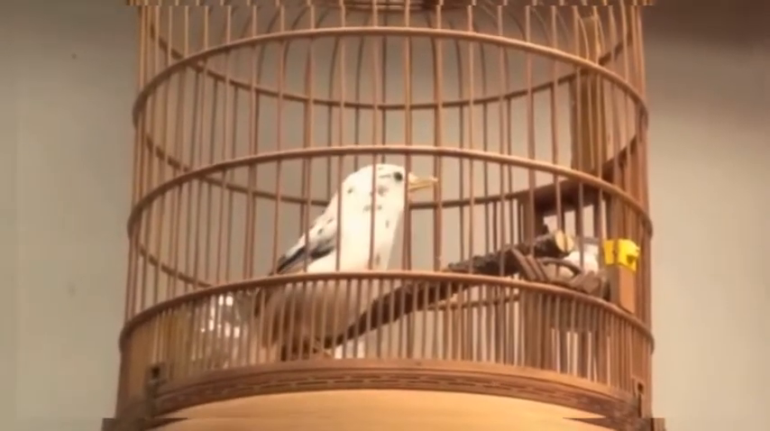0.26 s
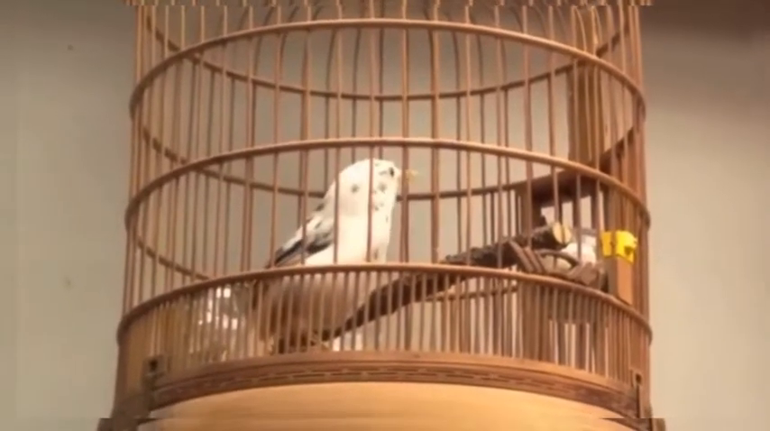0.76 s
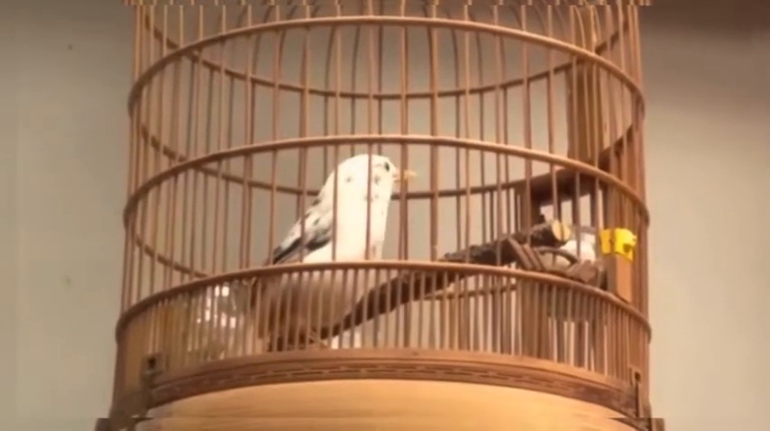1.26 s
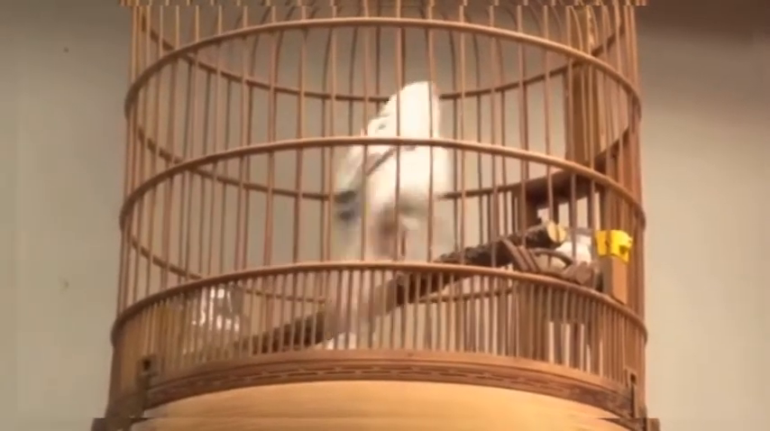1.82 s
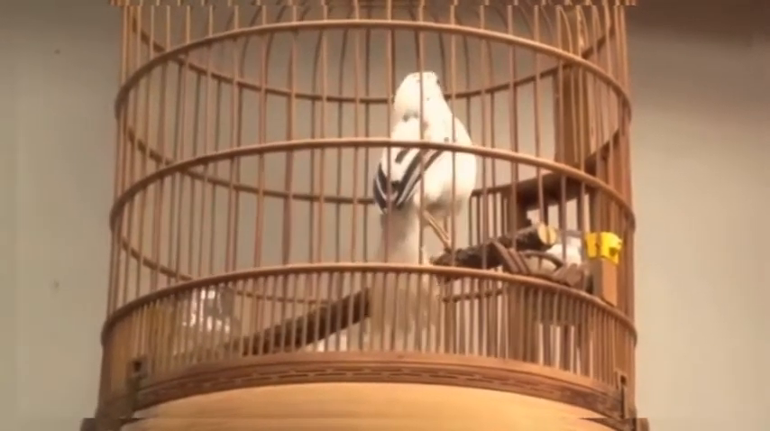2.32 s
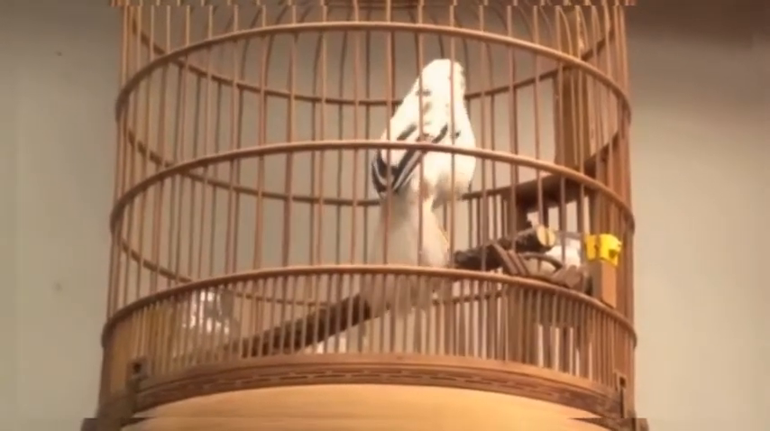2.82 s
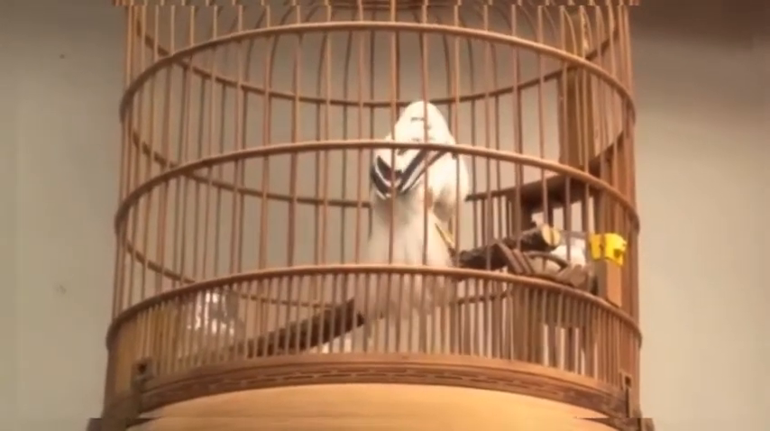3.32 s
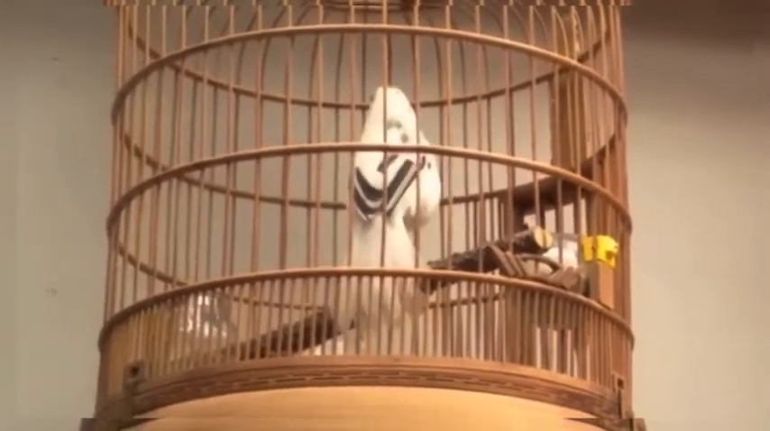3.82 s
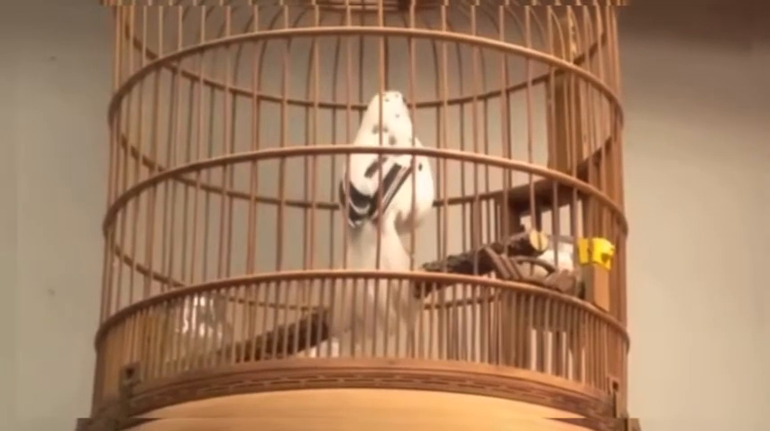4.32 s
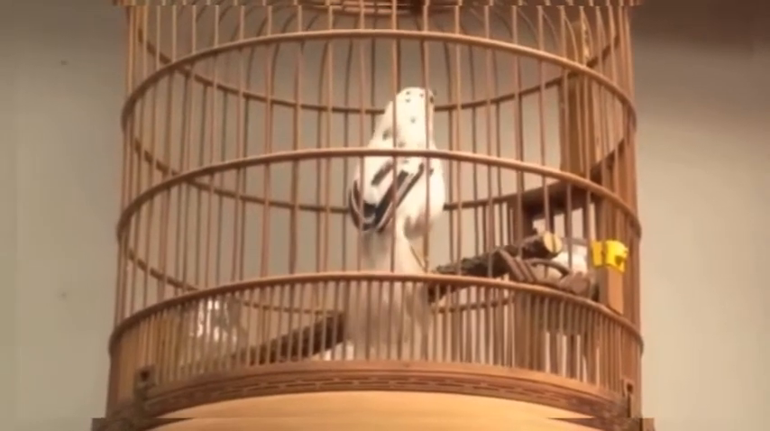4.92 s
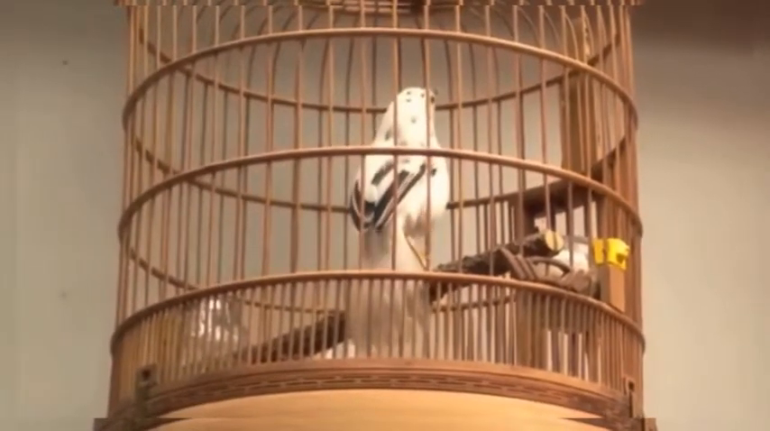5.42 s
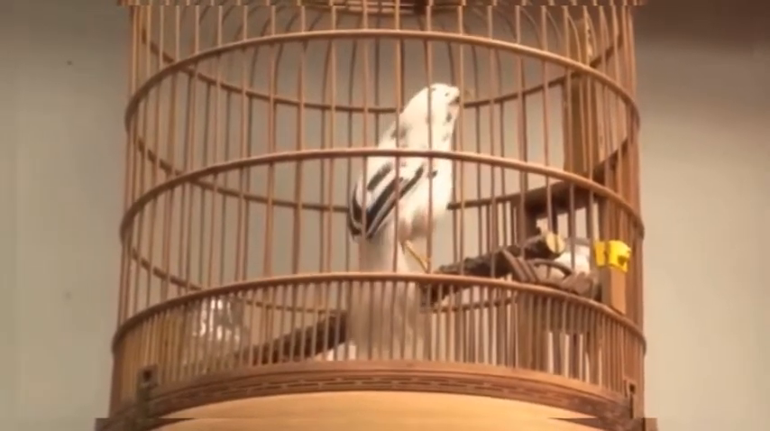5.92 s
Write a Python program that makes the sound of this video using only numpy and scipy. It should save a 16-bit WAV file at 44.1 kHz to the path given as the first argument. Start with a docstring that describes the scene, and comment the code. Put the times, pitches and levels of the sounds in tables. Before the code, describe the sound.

A caged songbird sings loud, pure sliding whistles, rasping chatter and fluttering buzzes in a bare echoing room over faint traffic and hiss.

```python
"""A laughingthrush sings in a bamboo cage in a bare, echoing room, over far traffic, hiss and a few knocks.
It opens with loud whistles, then mixes quick slides with chatter; three flick-and-slur pairs follow midway.
More chatter leads to fluttering buzzes, and a low whistle ends the song.
The voice is a nearly pure swept tone, smeared by decaying noise echoes; traffic and hiss are coloured noise,
knocks are short noise bursts, and peaks beyond full scale overload the microphone."""
import sys
import numpy as np
from scipy import signal
from scipy.fft import rfft, irfft
from scipy.io import wavfile
from scipy.ndimage import uniform_filter1d

SR = 44100
rng = np.random.default_rng(int(sys.argv[2]) if len(sys.argv) > 2 else 0)


def pcm_store(signal):
    """Save signal as 16-bit PCM."""
    levels = np.round(np.clip(np.atleast_2d(signal), -1, 1) * 32767)
    wavfile.write(sys.argv[1], SR, levels.astype(np.int16).T)


N = 271656
TIME = np.arange(N) / SR


def from_db(db):
    """Turns decibels into an amplitude factor."""
    return 10 ** (np.asarray(db) / 20)


def rms_one(x):
    """Scales a sound to an rms of 1."""
    return x / np.sqrt(np.mean(x ** 2) + 1e-20)


def at_hz(points, hz):
    """Reads a table along a log-frequency axis."""
    at, values = np.transpose(points)
    return np.interp(np.log(np.maximum(hz, 1)), np.log(at), values)


def wander(size, hz):
    """Smooth chance of spread near 1 that changes about hz times a second."""
    step = hz / SR
    knots = rng.standard_normal(4096)
    return 1.126 * np.interp(np.arange(size) * step, np.arange(4096), knots)


def add(out, start_s, sound):
    """Mixes a sound into the scene at its time."""
    at = int(round(start_s * SR))
    first, last = max(at, 0), min(at + sound.shape[-1], N)
    out[:, first:last] += sound[..., first - at:last - at]


def stereo_noise(spectrum, ripple_db=5.0):
    """Diffuse noise of a given colour, finely and randomly uneven across frequency, alike in both channels
    only in the bass."""
    # left-right likeness of the noise: (frequency [Hz], likeness [0-1])
    likeness = [(30, 0.92), (120, 0.9), (300, 0.85), (800, 0.39), (2000, 0), (15000, 0)]
    hz = np.arange(N // 2 + 1) * SR / N
    mid, side = rfft(rng.standard_normal((2, N)))
    alike = np.clip(at_hz(likeness, hz), -1, 1)
    pair = np.sqrt(1 + alike) * mid + np.sqrt(1 - alike) * side * [[1], [-1]]

    low, high = spectrum[0][0], spectrum[-1][0]
    low_skirt = 1 + (low / (hz + 1)) ** 4
    high_skirt = 1 + (hz / high) ** 8
    skirts = 1 / np.sqrt(low_skirt * high_skirt)

    # here wander runs along frequency, fading out toward the bass
    ripple = ripple_db * wander(len(hz), 110) * np.minimum(hz / 2000, 1)
    colour = from_db(at_hz(spectrum, hz) + ripple)
    return rms_one(irfft(pair * skirts * colour, N))


def background(rumble_db=0.0, murmur_db=1.83, hiss_db=15.5):
    """Far traffic, as rumble and murmur, and a soft hiss: coloured noises, each swelling and sinking."""
    # colour of each layer: (frequency [Hz], relative density [dB per Hz])
    rumble = [(28, -10), (55, -19), (85, 0), (115, -0.5), (135, 4), (165, -9.5)]
    murmur = [(170, -9.5), (237, -1), (275, -5.5), (320, -1), (440, -10.5), (520, -8.5), (730, -11),
              (900, -9.5)]
    hiss = [(400, -7), (900, -10.5), (2200, 7.5), (3600, 5.5), (4400, 4.5), (5200, 5), (6000, -3),
            (7000, -9.5), (8300, -7), (9500, -5.5), (11000, -7), (13000, -17), (15000, -12.5)]
    # course of each layer, before its offset above: (time [s], level [dB])
    rumble_level = [(0.0, -53), (0.05, -45), (0.17, -55), (0.89, -45), (0.98, -55), (3.24, -50),
                    (3.55, -40.5), (3.88, -53), (4.55, -44.5), (5.37, -59.5), (6.14, -49.5), (6.16, -55)]
    murmur_level = [(0.0, -48), (0.75, -47), (0.89, -42), (0.93, -52.5), (2.68, -50), (2.76, -46),
                    (2.8, -52.5), (2.97, -55), (3.52, -45.5), (4.2, -59), (4.24, -48), (4.6, -51),
                    (4.82, -61.5), (5.01, -51.5), (5.71, -53), (6.16, -45.5)]
    hiss_level = [(0.0, -43), (0.19, -50), (0.81, -47), (1.01, -53), (1.99, -52), (2.35, -54.5),
                  (3.16, -55), (3.31, -51), (4.3, -52.5), (4.48, -58.5), (4.72, -66.5), (4.89, -54.5),
                  (5.47, -69), (5.68, -56.5), (6.04, -48.5), (6.16, -43.5)]
    layers = (
        (rumble, rumble_level, rumble_db),
        (murmur, murmur_level, murmur_db),
        (hiss, hiss_level, hiss_db),
    )
    out = np.zeros((2, N))
    for colour, level, offset_db in layers:
        level_db = np.interp(TIME, *np.transpose(level)) + offset_db
        out += from_db(level_db) * stereo_noise(colour)
    return out


def knocks():
    """Short, dull bumps: dying noise through a band around the pitch of the struck part."""
    # knocks on perch and cage: (time [s], peak level [dB], pitch [Hz], 60 dB decay time [s])
    bumps = [(0.87, -33.5, 600, 0.28), (2.75, -31.5, 256, 0.068), (4.379, -28, 226, 0.018),
             (6.09, -25.5, 806, 0.37)]
    out, t = np.zeros((2, N)), np.arange(SR // 2) / SR
    for s, level_db, hz, t60 in bumps:
        burst = rng.standard_normal(len(t)) * np.exp(-np.log(1000) * t / t60)
        band = signal.butter(2, [hz / 2, hz * 2], "band", fs=SR, output="sos")
        body = signal.sosfilt(band, burst)
        add(out, s, from_db(level_db) * body / np.max(np.abs(body)))
    return out


def room_response(gap_s=0.0069, early_db=8.5, early_s=0.073):
    """Dense wall echoes, strong at first, each band of noise dying at its own rate."""
    # reverberation of the bare room: (frequency [Hz], 60 dB decay time [s])
    room_t60 = [(1000, 0.66), (2000, 0.51), (3000, 0.85), (5000, 0.31), (9000, 0.45), (15000, 0.29)]
    t = np.arange(SR) / SR
    edges = np.geomspace(500, 18000, 9)
    out = 0
    for low, high in zip(edges, edges[1:]):
        band = signal.butter(2, [low, high], "band", fs=SR, output="sos")
        noise = signal.sosfilt(band, rng.standard_normal((2, SR)))
        t60 = at_hz(room_t60, np.sqrt(low * high))
        out = out + noise * np.exp(-np.log(1000) * t / t60)
    onset = 1 - np.exp(-(t / gap_s) ** 2)
    return out * onset * from_db(early_db * np.exp(-t / early_s))


def in_room(voice, walls, direct_db=-10.0, echo_db=-2.0):
    """The direct sound plus echoes that carry a set share of the voice's energy in each channel."""
    echoes = signal.fftconvolve(walls, voice[None], axes=1)
    energy_ratio = np.sum(voice ** 2) / np.sum(echoes ** 2, axis=1, keepdims=True)
    echoes *= from_db(echo_db) * np.sqrt(energy_ratio)
    echoes[:, :len(voice)] += from_db(direct_db) * voice
    return echoes


def glide(rows):
    """Joins the points of a note into one smooth control per column."""
    s, *columns = np.transpose(rows)
    s = np.maximum.accumulate(s)
    t = np.arange(s[0], s[-1] + .002, 1 / SR)
    return [uniform_filter1d(np.interp(t, s, c), size=130, mode="nearest") for c in columns]


def flutter(size, hz, unsteady=0.0033):
    """The fast tremble of the membrane: a sine whose rate strays by the share unsteady."""
    rate = hz * (1 + unsteady * wander(size, 60))
    return np.sin(2 * np.pi * np.cumsum(rate) / SR)


def syrinx(pitch, level_db, jitter=.006, shimmer_db=4.0, edge_s=0.00055, rasp_db=-36.0,
           strain_db=26.0, mellow_db=31.0):
    """A membrane swings almost as a sine; high, strained notes have stronger overtones, low ones almost none."""
    # how strongly an overtone leaves the beak, before strain: (frequency [Hz], level [dB])
    beak = [(3000, -38), (4200, -28), (5400, -27.5), (6500, -30.5), (9500, -34), (12000, -38.5),
            (14500, -32.5)]
    size = len(pitch)
    pitch = pitch * (1 + jitter * wander(size, 492.1))
    phase = 2 * np.pi * np.cumsum(pitch) / SR

    strained = strain_db * np.clip(np.log2(pitch / 3200), 0, 1)
    mellowed = mellow_db * np.minimum(np.log2(pitch / 2600), 0)
    tone = np.sin(phase)
    for k in np.arange(2, 6):
        overtone_db = at_hz(beak, k * pitch) + strained + mellowed
        tone += from_db(overtone_db) * np.sin(k * phase) * (k * pitch < SR / 2)
    # breathy noise, strongest in the bass
    tone += from_db(rasp_db) * signal.lfilter([1], [1, -.6], rng.standard_normal(size))

    t = np.arange(size) / SR
    edges = np.clip(np.minimum(t, t[-1] - t) / edge_s, 0, 1)
    gate = np.sin(np.pi / 2 * edges) ** 2
    shimmer = shimmer_db * wander(size, 204)
    return np.sqrt(2) * tone * gate * from_db(level_db + shimmer)


def chat(length_s, foot_hz, top_hz, level_db, depth_hz=280.0, foot_db=-3.5):
    """One rough note that shoots up and falls back, loudest at its top."""
    arch = np.sin(np.linspace(0, np.pi, int(length_s * SR)))
    pitch = foot_hz + (top_hz - foot_hz) * arch + depth_hz * flutter(len(arch), 260.0)
    return syrinx(pitch, level_db + foot_db * (1 - arch), jitter=0.0367)


def buzz(rows, throb_db=0.5):
    """Pitch and strength tremble together, which spreads the note into side tones."""
    pitch, level_db, depth_hz = glide(rows)
    tremble = flutter(len(pitch), 198.0)
    return syrinx(pitch + depth_hz * tremble, level_db + throb_db * tremble, jitter=0.015, rasp_db=-38.5)


def whistle(pitch, level_db, hoarse=0.0, flick_jitter=0.041, hoarse_jitter=0.052, depth_hz=324.0, rate_hz=170.0):
    """A sliding note: clean when held, uneven in the fastest flicks, hoarse when its pitch shakes widely."""
    octaves_per_s = np.abs(np.gradient(np.log2(pitch))) * SR
    haste = np.clip(octaves_per_s / 50, 0, 1) ** 2
    jitter = 0.0014 + np.maximum(flick_jitter * haste, hoarse * hoarse_jitter)
    shake = hoarse * depth_hz * flutter(len(pitch), rate_hz, unsteady=0.252)
    return syrinx(pitch + shake, level_db, jitter=jitter)


def slide(length_s, from_hz, to_hz, level_db, hoarse, sag=0.25,
          throat_hz=2506, throat_octaves=0.9, off_throat_db=19.5):
    """One sweep, slower at its low end and loudest where it crosses the throat resonance."""
    along = np.linspace(0, 1, int(length_s * SR))
    octaves = np.log2(to_hz / from_hz)
    # the sweep hangs below an even glide
    hang = sag * abs(octaves) * 2 * along * (1 - along)
    pitch = from_hz * 2 ** (octaves * along - hang)
    in_tune = np.exp(-(np.log2(pitch / throat_hz) / throat_octaves) ** 2)
    return whistle(pitch, level_db - off_throat_db * (1 - in_tune), hoarse)


def flick(hold_s, level_db):
    """A thin high note swells, then plunges and fades."""
    top_hz, end_hz, drop_s = 4885, 2012, 0.02
    swell_db, fade_db, hoarseness = 15, 7, 0.3
    t = np.arange(int((hold_s + drop_s) * SR)) / SR
    swell = np.minimum(t / hold_s - 1, 0)
    drop = np.maximum(t - hold_s, 0) / drop_s
    pitch = top_hz * (end_hz / top_hz) ** drop
    return whistle(pitch, level_db + swell_db * swell - fade_db * drop, hoarseness)


def slur(climb_s, hold_s, top_hz, level_db):
    """A clean note that climbs steadily, leaps to its top and stays there."""
    foot_hz, attack_s, attack_db = 1743, 0.036, 9.5
    leap, leap_power = 0.42, 7  # share of the climb left to a final leap, and how late it comes
    t = np.arange(int((climb_s + hold_s) * SR)) / SR
    along = np.minimum(t / climb_s, 1)
    height = (1 - leap) * along + leap * along ** leap_power
    attack = attack_db * np.minimum(t / attack_s - 1, 0)
    return whistle(foot_hz + (top_hz - foot_hz) * height, level_db + attack)


def bird():
    """All the notes of the song, each sounding in the room; their levels are those before the room."""
    # whistles, one curve each: (time [s], pitch [Hz], level [dB])
    whistles = [
        [(-0.05, 2095, -11), (0.0, 3533, -12), (0.05, 3440, -45), (0.10, 3410, -13), (0.125, 3221, -2.5),
         (0.165, 3143, -7), (0.18, 3087, -1), (0.195, 2723, -5.5), (0.21, 2257, -8)],
        [(0.232, 2067, -11), (0.30, 2264, -8), (0.338, 2388, -3.5), (0.385, 2424, -4.5), (0.438, 2382, -7.5),
         (0.455, 2166, -7.5), (0.472, 1940, -14)],
        [(1.945, 3287, -11), (1.96, 3165, -12), (1.99, 2956, -13.5), (2.02, 2755, -14.5), (2.065, 2684, -24.5)],
        [(2.797, 2197, -19.5), (2.812, 2870, -22), (2.837, 2700, -15.5), (2.86, 2033, -8.5), (2.885, 1440, -30)],
        [(5.977, 1653, -18), (5.99, 1703, -13.5), (6.04, 1695, -15), (6.065, 1568, -8.5), (6.12, 1500, -14),
         (6.17, 1533, -7)],
    ]
    # a faint thin tone: (time [s], pitch [Hz], level [dB])
    far_whistle = [(2.15, 3770, -49), (2.5, 3700, -44), (2.7, 3723, -60)]
    # buzzy notes, one curve each: (time [s], pitch [Hz], level [dB], flutter depth [Hz])
    buzzes = [
        [(5.055, 1790, -17, 230), (5.125, 1790, -16, 230), (5.165, 1960, -16, 220), (5.225, 2010, -10.5, 160),
         (5.27, 2000, -15, 160), (5.315, 1850, -24, 190)],
        [(5.455, 2137, -20.5, 120), (5.48, 2484, -17, 157), (5.505, 2617, -8.5, 80), (5.535, 2597, -11.5, 60),
         (5.56, 2520, -53, 60)],
        [(5.605, 2293, -22.5, 119), (5.627, 2773, -11, 126), (5.66, 2770, -11.5, 90), (5.70, 2627, -25, 110)],
    ]
    # quick slides: (time [s], length [s], from [Hz], to [Hz], level at the throat resonance [dB],
    # hoarseness [about 0-1])
    slides = [ (0.064, 0.039, 930, 2340, -6.5, 0.14), (0.32, 0.058, 4700, 1342, -8, 0.43),
              (0.474, 0.099, 2000, 1457, -15, 1.0), (0.93, 0.044, 908, 2396, -11, 0.14),
              (1.208, 0.049, 4500, 1395, -9, 0.57), (1.379, 0.034, 2100, 1456, -20, 1.11),
              (1.823, 0.023, 3304, 1893, -14.5, 0.81), (2.291, 0.059, 2092, 1174, -22, 1),
              (2.515, 0.055, 2544, 1207, -19.5, 1.02), (2.712, 0.037, 1612, 2710, -25, 0.85),
              (2.786, 0.027, 4010, 6000, -12, 1.12), (3.0, 0.055, 2305, 1166, -20, 0.77),
              (3.241, 0.04, 2235, 1470, -16.5, 0.74), (4.314, 0.023, 1163, 1060, -19, 0.18),
              (4.366, 0.025, 3130, 1536, -15.5, 0.1), (4.616, 0.022, 1890, 1113, -23, 0.3),
              (5.405, 0.028, 1200, 1410, -25.5, 0.1), (5.415, 0.018, 706, 700, -21, 0.04), ]
    # rising slurs: (time [s], climb [s], hold [s], top [Hz], level after the attack [dB])
    slurs = [(3.328, 0.087, 0.04, 3138, -14.5), (3.77, 0.1, 0.033, 3115, -14),
             (4.251, 0.094, 0.024, 3103, -14)]
    # high flicks, one before each slur: (time [s], hold [s], level at the top of the swell [dB])
    flicks = [(3.135, 0.033, -12.5), (3.619, 0.014, -16), (4.094, 0.015, -15.5)]
    # chatter, quick rasping arches: (time [s], length [s], foot [Hz], top [Hz], level at the top [dB])
    chatter = [ (1.299, 0.057, 1400, 2200, -20), (1.401, 0.065, 1524, 1929, -20.5),
               (1.765, 0.0276, 2383, 3246, -16.5), (1.79, 0.04, 2730, 3600, -14),
               (1.9, 0.049, 2715, 3450, -13.5), (2.681, 0.035, 1245, 2006, -20.5),
               (4.653, 0.036, 1594, 2612, -24), (4.704, 0.04, 1654, 2700, -20.5),
               (4.758, 0.029, 1680, 3050, -20), (4.819, 0.022, 1510, 3200, -17),
               (4.889, 0.033, 1610, 2950, -17), (4.953, 0.048, 1673, 2550, -16.5),
               (5.011, 0.036, 1518, 2420, -17.5), ]

    out, walls = np.zeros((2, N)), room_response()
    for rows in whistles + [far_whistle]:
        add(out, rows[0][0], in_room(whistle(*glide(rows)), walls))
    for rows in buzzes:
        add(out, rows[0][0], in_room(buzz(rows), walls))
    for voice, notes in ((slide, slides), (slur, slurs), (flick, flicks), (chat, chatter)):
        for s, *shape in notes:
            add(out, s, in_room(voice(*shape), walls))
    return out


def scene():
    """The song over the quiet room."""
    return background() + knocks() + bird()


def record(dry, ceiling=1.0):
    """The microphone overloads: peaks beyond the ceiling are clipped, then a steep filter cuts the top."""
    clipped = np.clip(dry, -ceiling, ceiling)
    top_cut = signal.ellip(10, .1, 70, 15250, fs=SR, output="sos")  # low-pass at 15250 Hz
    return signal.sosfilt(top_cut, clipped)


dry = scene()
out = record(dry)
pcm_store(out)
```